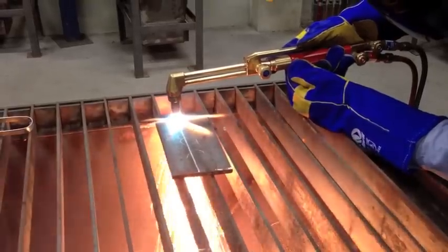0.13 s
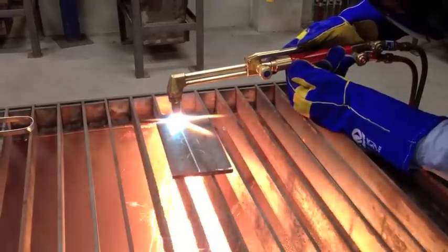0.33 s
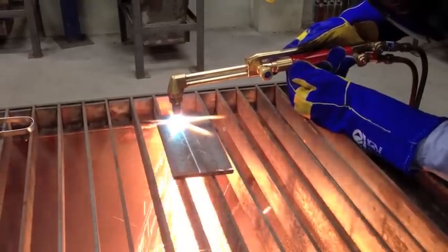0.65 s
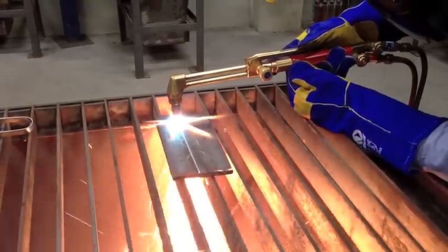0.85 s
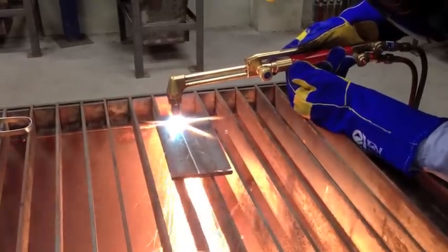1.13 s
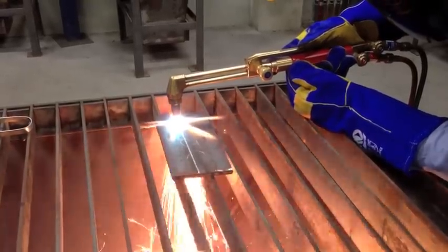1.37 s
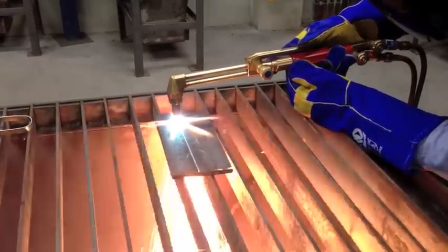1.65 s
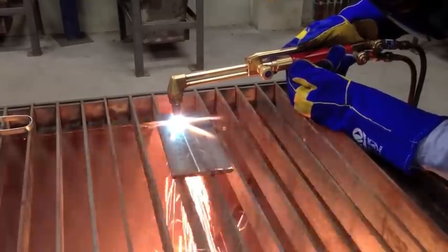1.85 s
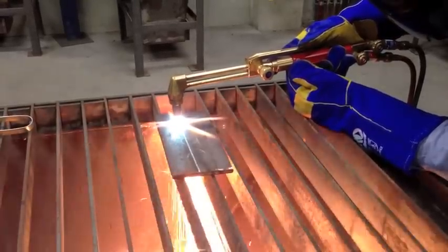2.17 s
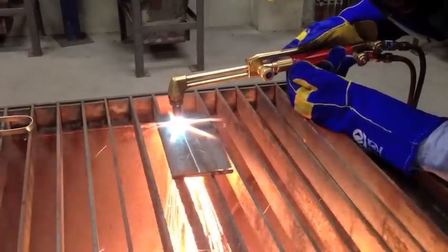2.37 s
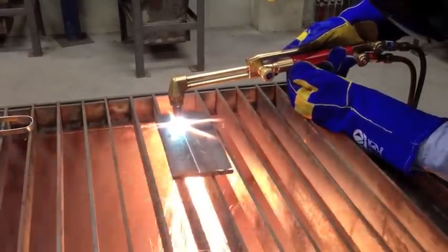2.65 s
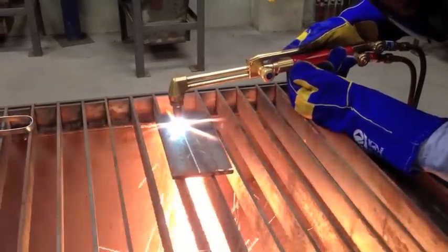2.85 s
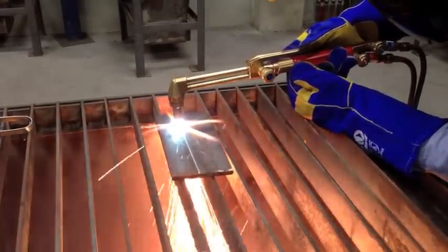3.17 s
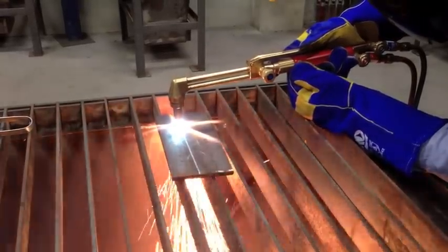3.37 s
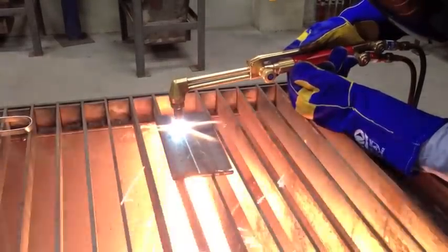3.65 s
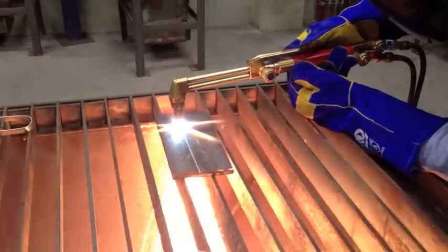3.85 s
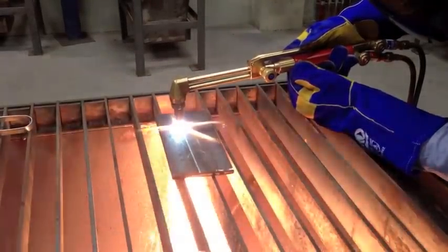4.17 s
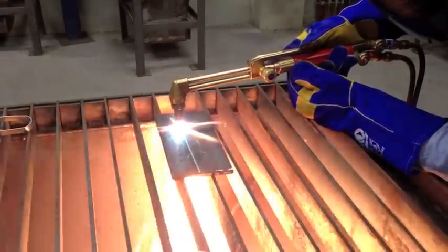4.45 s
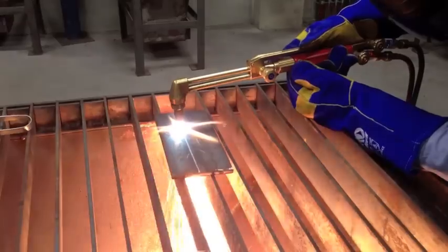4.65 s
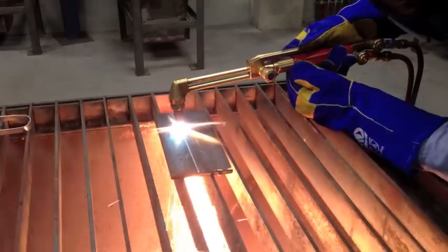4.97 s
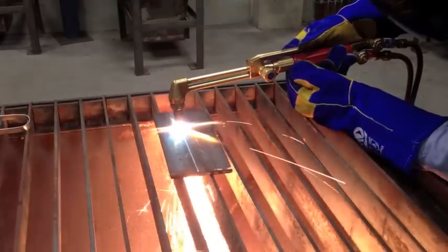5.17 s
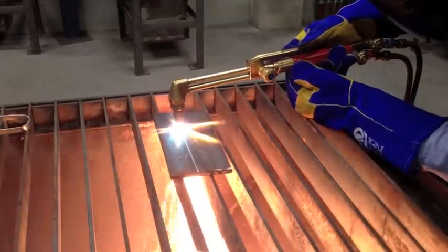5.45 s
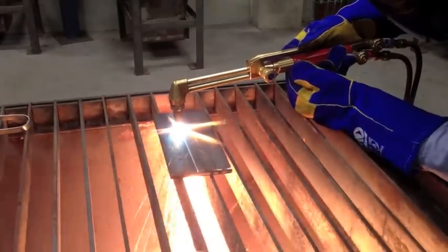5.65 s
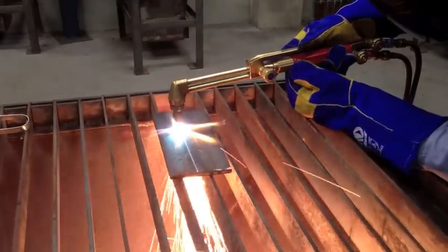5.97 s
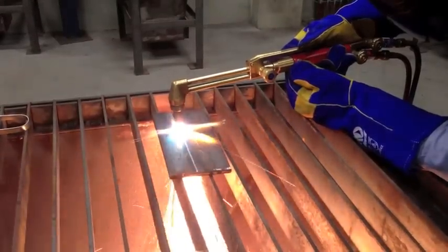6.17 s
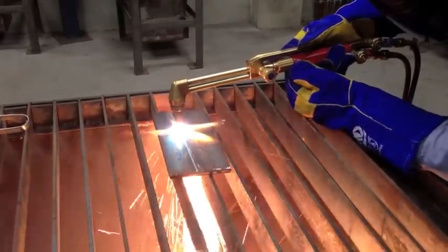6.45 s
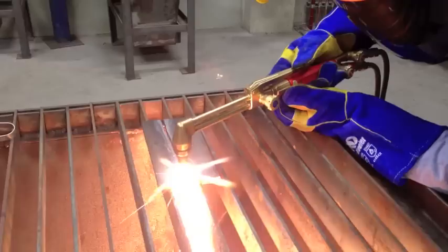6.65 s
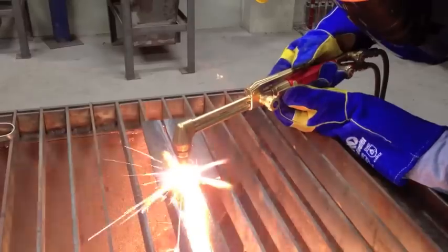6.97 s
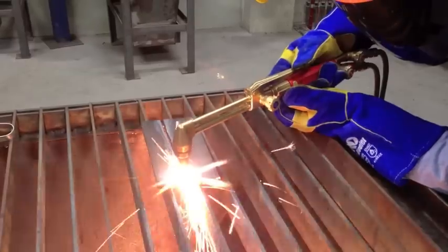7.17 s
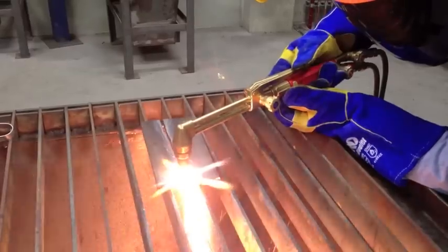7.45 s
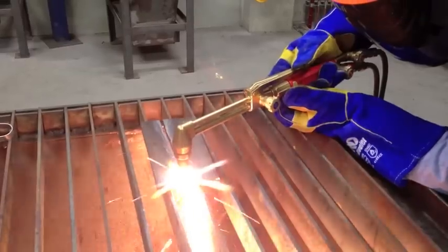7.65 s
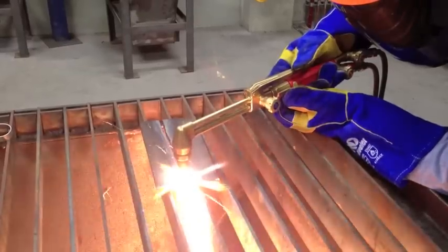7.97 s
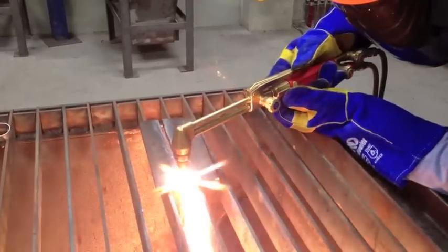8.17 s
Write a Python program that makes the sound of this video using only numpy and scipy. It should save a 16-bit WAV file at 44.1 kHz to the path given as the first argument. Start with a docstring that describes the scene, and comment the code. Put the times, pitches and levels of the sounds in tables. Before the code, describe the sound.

Steady bright hiss of a torch cutting steel, with faint slag spits and a low fan drone, dropping out for an instant late on.

```python
"""Torch cutting steel plate

An oxy-acetylene torch cuts steel on a slatted table in a workshop, over the drone of a fan.
The oxygen jet roars in the kerf, hisses, fizzes at the nozzle and half whistles on the kerf's lip.
It surges as the melt blows through and lulls as it clogs, while molten slag spits in bright ticks.
Late on, the whole sound dips briefly and comes back with the gap under the tip ringing at new pitches."""
import sys
import numpy as np
from scipy import signal
from scipy.fft import rfft, irfft
from scipy.io import wavfile

SR = 44100
rng = np.random.default_rng(int(sys.argv[2]) if len(sys.argv) > 2 else 0)


def bounce(signal):
    """Save signal as a 16-bit WAV file at the path given by the first command-line argument."""
    frames = np.transpose(np.atleast_2d(signal))
    limited = np.clip(frames, -1, 1)
    pcm = np.round(limited * 32767).astype(np.int16)
    wavfile.write(sys.argv[1], SR, pcm)


N = 366912
SIZE, HOP = 2048, 512
HZ = np.fft.rfftfreq(SIZE, 1 / SR)
T = np.arange(N // HOP + 4)[:, None] * HOP / SR  # frame times, s
SECONDS = np.arange(N) / SR
DIP_S, DIP_FADE_S = 6.738, 0.068


def gain_of(db):
    """Decibels to amplitude."""
    return 10 ** (np.asarray(db) / 20)


def unit_rms(x):
    """Scales to an rms of one."""
    return x / np.sqrt(np.mean(x ** 2) + 1e-20)


def colour(points):
    """An EQ curve in dB, joined by straight lines over log frequency."""
    hz, db = np.transpose(points)
    return np.interp(np.log(HZ + 1), np.log(hz + 1), db)


def bell(x, centre, width):
    """A bump of height one, with its width taken at half height."""
    return .5 ** ((2 * (x - centre) / width) ** 2)


def patches(length_s, width_hz):
    """A smooth random field over time and frequency."""
    field = rng.standard_normal((len(T), len(HZ)))
    field = signal.fftconvolve(field, bell(T, T.mean(), length_s), "same", axes=0)
    return unit_rms(signal.fftconvolve(field, bell(HZ, HZ.mean(), width_hz)[None], "same", axes=1))


def unrest(length_s=.05):
    """A smooth random rise and fall, one value per frame."""
    return unit_rms(signal.fftconvolve(rng.standard_normal(T.shape), bell(T, T.mean(), length_s), "same"))


def flutter(rate_hz):
    """A random wobble that thins out above the given rate."""
    hz = np.fft.rfftfreq(N, 1 / SR)
    return unit_rms(irfft(rfft(rng.standard_normal(N)) * (hz > 2) / (1 + (hz / rate_hz) ** 2), N))


def shaped_noise(gains):
    """Noise that follows a field of amplitudes (frames, bins)."""
    white = rng.standard_normal((len(T) - 1) * HOP)
    spectra = signal.stft(white, nperseg=SIZE, noverlap=SIZE - HOP)[2]
    return signal.istft(spectra * gains.T, nperseg=SIZE, noverlap=SIZE - HOP)[1][:N] * np.sqrt(SIZE / 2)


# Slow rise and fall of the fan: time_s, level_db
FAN_LEVEL = [(0, -43.5), (2, -44.5), (2.7, -46), (4.25, -42.5), (5, -47), (5.5, -44), (7.45, -47),
             (8.1, -44.5)]
# EQ of its rushing air: freq_hz, relative_db
FAN_EQ = [(20, -48), (50, -37), (80, -26), (108, -20), (135, -4), (200, -3), (300, 2.5), (365, 3.5),
          (420, 0), (500, -3.5), (575, 1), (670, -6.5), (1200, -16.5), (5000, -20)]
# Its duct tones: pitch_hz, half_width_hz, average_level_db
DUCT_TONES = [(134.7, 6.2, -68.5), (193.2, 8.5, -62), (272.2, 11.6, -59), (326, 18.5, -54),
              (380.5, 6.7, -52.5)]

def fan(rush_trim_db=-0.5):
    """A low rush of air with a few narrow, wavering duct tones."""
    level_db = np.interp(SECONDS, *np.transpose(FAN_LEVEL))
    rush = unit_rms(shaped_noise(gain_of(colour(FAN_EQ) + 1.3 * patches(0.18, 72))))
    freqs = np.fft.rfftfreq(N, 1 / SR)
    tones = 0
    for hz, half_width, db in DUCT_TONES:
        band = rfft(rng.standard_normal(N)) * bell(freqs, hz, 2 * half_width)
        tones += gain_of(db) * unit_rms(irfft(band, N))
    return gain_of(level_db + rush_trim_db) * rush + gain_of(level_db - level_db.mean()) * tones


def slag(spits_per_s=140, level_db=-47):
    """Droplets burst in tiny bright ticks, a few of them large; they are too small to radiate bass."""
    strength = gain_of(1.5 * np.minimum(rng.exponential(1, N), 4))
    bursts = strength * (rng.random(N) < spits_per_s / SR)
    pitch_index = rng.integers(0, 12, N)
    t = np.arange(256) / SR
    spits = np.zeros(N)
    for k, hz in enumerate(np.geomspace(1800, 12000, num=12)):
        tick = np.exp(-t / 0.00033) * (np.sin(2 * np.pi * hz * t) + .5 * rng.standard_normal(len(t)))
        spits += signal.oaconvolve(bursts * (pitch_index == k), tick)[:N]
    low_cut = signal.butter(4, 700, "highpass", fs=SR, output="sos")
    return gain_of(level_db) * unit_rms(signal.sosfilt(low_cut, spits))


# Ring of the gap early, midway and after the dip: pitch_hz, width_hz, lift_db
EARLY_RING = [(886, 55, 3), (1290, 170, 5.5), (1970, 110, 7), (2240, 100, 4.5), (2610, 70, 5.5),
              (2800, 280, 0), (3090, 120, 7.5), (3327, 140, 7), (3680, 170, 1), (3915, 250, 6),
              (4220, 120, 3.5), (4250, 70, 0), (4560, 110, 0), (4730, 68, 7), (5050, 76, 1.8),
              (5560, 71, 4.2), (5750, 120, 0.5), (6140, 100, 2.5), (6760, 200, 1)]
MIDWAY_RING = [(1266, 270, 7), (1774, 80, 5.5), (2030, 62, 1), (2440, 95, 3.7), (2750, 150, 4.5),
               (3050, 110, 3.5), (3300, 170, 2.5), (3620, 110, -1.5), (3880, 170, 0.5), (4200, 190, 4),
               (4550, 83, 3.5), (4940, 220, 3), (5430, 90, 1), (5800, 210, 0.5), (6480, 200, 0)]
LATE_RING = [(720, 56, 3), (1010, 140, 4), (1270, 130, -1.5), (1560, 63, 2.5), (1740, 63, 5.5),
             (2020, 100, 5), (2600, 90, 4.5), (2870, 110, -3.5), (3250, 100, 5.5), (3460, 160, 5),
             (3850, 150, 3.5), (4300, 150, 6.5), (5070, 62, 3), (5340, 70, 5), (5870, 72, -1),
             (6900, 300, -4), (7600, 250, 1.5)]

def gap_resonances(midway_s=3.85, crossfade_s=.5):
    """Lift in dB from the gap between tip, kerf and plate, which retunes as the torch advances."""
    early, midway, late = (sum(db * bell(HZ, hz, width) for hz, width, db in ring)
                           for ring in (EARLY_RING, MIDWAY_RING, LATE_RING))
    blend = np.clip(.5 + (T - midway_s) / crossfade_s, 0, 1)
    return np.where(T < DIP_S, (1 - blend) * early + blend * midway, late)


# Breathy whistles: peak_s, length_s, pitch_hz, glide_hz_per_s, lift_db
EDGE_WHISTLES = [(.25, 0.6, 4840, 0, 4), (.6, 1.1, 5160, 0, 6), (1.05, .2, 3255, 0, 13),
                 (.55, 0.94, 3850, 0, -1), (1.55, 1.1, 8900, -100, 6), (2.65, 0.5, 10270, 0, 4),
                 (3.1, .9, 13300, 0, 0), (3.35, 0.62, 11500, 0, 4), (4.19, .12, 12100, 0, 5),
                 (4.8, .6, 9720, 0, 7), (5.1, 1.3, 6240, 80, 2), (5.95, .4, 12000, 500, 4),
                 (6.35, .4, 12330, 9, 4), (7.31, 0.18, 5870, 0, 7)]

def edge_tones(stray_s=0.44, stray_db=2, low_hz=4040, high_hz=13900):
    """Lift in dB where the jet catches the lip of the kerf: placed whistles plus faint random strays."""
    strays = [(when * N / SR, stray_s, low_hz * (high_hz / low_hz) ** pitch, 0, stray_db)
              for when, pitch in rng.random(size=(24, 2))]
    return sum(db * bell(T, peak, length) * bell(HZ, hz + glide * (T - peak), width=0.022 * hz)
               for peak, length, hz, glide, db in list(EDGE_WHISTLES) + strays)


# Broad rushes and hollows (negative): peak_s, length_s, centre_hz, width_hz, lift_db
KERF_RUSHES = [(.05, .1, 1800, 700, -2), (1.1, .4, 13100, 550, -2), (1.25, .55, 10990, 480, 4),
               (1.4, 0.2, 13600, 2400, -2), (1.46, 0.077, 1900, 1400, 5), (2.15, .8, 2820, 350, -2.5),
               (3.2, 1, 3770, 350, -2), (4.19, 0.17, 1450, 130, 7.5), (4.17, 0.54, 2010, 131, 7),
               (4.2, .1, 12900, 2800, -1), (4.25, 0.42, 6450, 2400, -4.3), (4.64, .3, 12900, 2200, -2.5),
               (5.05, 0.83, 11300, 700, -3), (5.2, .7, 5800, 900, 1.5), (5.47, .16, 1310, 200, 4),
               (5.95, 0.45, 1200, 600, -3.5), (6.25, 0.52, 3720, 700, 4.5), (6.43, 0.37, 13400, 2400, 3),
               (7.42, 0.38, 8800, 3200, 2.5), (7.9, .5, 13000, 2500, -2.5), (7.93, 0.34, 1590, 250, 7.5)]

def kerf_rushes():
    """Lift in dB as the kerf opens and rushes, or closes and sounds hollow."""
    return sum(db * bell(T, peak, length) * bell(HZ, hz, width)
               for peak, length, hz, width, db in KERF_RUSHES)


# Held howls: start_s, end_s, pitch_hz, width_hz, lift_db
HELD_HOWLS = [(3.65, 4.5, 4190, 110, 0), (3.78, 4.3, 9740, 330, 4), (3.88, 4.55, 1360, 260, 2.5),
              (3.896, 4.54, 900, 170, 5), (7.27, 8.4, 4170, 105, 7.5), (7.25, 8.4, 3250, 110, 4)]

def howls(rise_s=0.085, drop_s=.04):
    """Lift in dB from resonances that lock in while the jet bites cleanly through, then break off."""
    return sum(db * np.clip(np.minimum((T - start) / rise_s, (end - T) / drop_s), 0, 1) * bell(HZ, hz, width)
               for start, end, hz, width, db in HELD_HOWLS)


# Slow drift around the steady jet: time_s, roar_db, hiss_db, fizz_db
HAND_DRIFT = [(0, -1.3, 0.5, 1), (1.2, -0.4, 0.5, 0), (2.2, -2, -1, -1), (2.8, .9, 0.7, 0.5),
              (3.5, -0.5, -0.5, 1.5), (3.85, 2, 1.8, 0), (4.5, 1.5, -0.5, -1), (5.3, 1, 1.1, -1),
              (6.7, 1, 0.1, 1), (7.55, -1.5, 1.5, -1.5), (7.8, -2, -0.5, -2.5), (8.3, -0.5, 1.5, 0.5)]
# Surges and lulls (negative): peak_s, length_s, lift_db, brightness_db
MELT_SURGES = [(.04, 0.15, 0.57, -3), (.33, 0.069, 0.96, -1.5), (.72, 0.17, -0.071, -1.5),
               (.92, 0.13, -0.35, 0.3), (1.46, 0.1, 1.6, 0), (2.53, 0.2, 1.3, 1), (3.32, 0.056, 0.9, -1.5),
               (3.55, 0.17, -0.63, 1.7), (3.7, .11, 0.75, 1), (4.19, 0.27, 1.8, -1.5),
               (4.48, 0.092, 1.8, -1.5), (4.68, 0.16, -1.4, 1), (4.95, 0.14, .9, 0), (5.47, .12, 1.3, -1.5),
               (5.68, 0.31, -0.93, 0.5), (6.35, 0.081, 1.4, 0.5), (6.46, 0.17, 1.8, 0.5),
               (6.62, 0.16, -1.2, -1.2), (7.22, 0.077, -0.67, 0.5), (7.45, 0.18, 1.3, 1.5),
               (7.92, 0.28, 2.6, -1.6)]
ROAR_DB, HISS_DB, FIZZ_DB = -33.5, -27.5, -30.5

def swells():
    """Roar, hiss and fizz in dB: they drift with the hand and surge or lull as the melt clears or clogs."""
    times, *drifts = np.transpose(HAND_DRIFT)
    surge_db = 0.22 * unrest() + sum(db * bell(T, peak, length) for peak, length, db, _ in MELT_SURGES)
    bright_db = sum(db * bell(T, peak, length) for peak, length, _, db in MELT_SURGES)
    tilted = (ROAR_DB - bright_db, HISS_DB, FIZZ_DB + bright_db)
    return [base_db + np.interp(T, times, drift_db) + surge_db + 0.14 * unrest()
            for base_db, drift_db in zip(tilted, drifts)]


def sizzle(from_hz=8200):
    """Lift in dB as the melt sizzles: the treble flares briefly and wanders from pitch to pitch."""
    flare_db = 0.96 * patches(length_s=0.038, width_hz=1000)
    wander_db = .6 * patches(length_s=.2, width_hz=300)
    return (flare_db + wander_db) / (1 + (from_hz / (HZ + 1)) ** 4)


# Base EQ of the jet: freq_hz, relative_db
JET_EQ = [(60, -60), (150, -53), (400, -18.5), (650, -12.5), (800, -5), (1080, -9), (1250, -4.5),
          (2200, -3), (3300, -3), (5000, -1.5), (6800, -2), (7600, -4), (8500, -6), (10000, -5),
          (11500, -5.5), (12900, -6.5), (14100, -4.5), (15200, -7)]

def jet():
    """Turbulent gas, coloured by the gap under the tip and the kerf; the melt makes it sputter slightly."""
    # reflections from plate and slats leave fine, drifting ripples
    ripple_db = 1.3 * patches(.3, 25) + 1.15 * patches(.06, 110)
    passing_db = sizzle() + edge_tones() + kerf_rushes() + howls()
    gains = gain_of(colour(JET_EQ) + gap_resonances() + ripple_db + passing_db)
    # ride roar, hiss and fizz to their own levels, crossfading between the bands
    bands_hz = [(700, 2600), (3000, 8000), (10000, 15300)]
    blend_hz = [1900, 3760, 6200, 10900]
    shares = [[1, 0, 0, 0], [0, 1, 1, 0], [0, 0, 0, 1]]
    swell_db = 0
    for level_db, (low, high), share in zip(swells(), bands_hz, shares):
        band_db = 10 * np.log10((gains[:, (HZ > low) & (HZ < high)] ** 2).sum(1, keepdims=True))
        swell_db += (level_db - band_db) * np.interp(HZ, blend_hz, share)
    sputter_db = 0.38 * flutter(rate_hz=23) + 0.41 * flutter(rate_hz=240)
    return shaped_noise(gains * gain_of(swell_db)) * gain_of(sputter_db)


def scene():
    """Torch and fan, both in the centre."""
    centre = jet() + slag() + fan()
    return np.array([centre, centre])


def record(dry):
    """The level dips briefly to near silence, and a steep filter takes off the very top."""
    dip = np.clip(abs(SECONDS - DIP_S) / DIP_FADE_S, .02, 1)
    high_cut = signal.firwin(801, cutoff=15400, window=("kaiser", 8), fs=SR)
    return signal.oaconvolve(dry * dip, high_cut[None], "same")


dry = scene()
out = record(dry)
bounce(out)
```